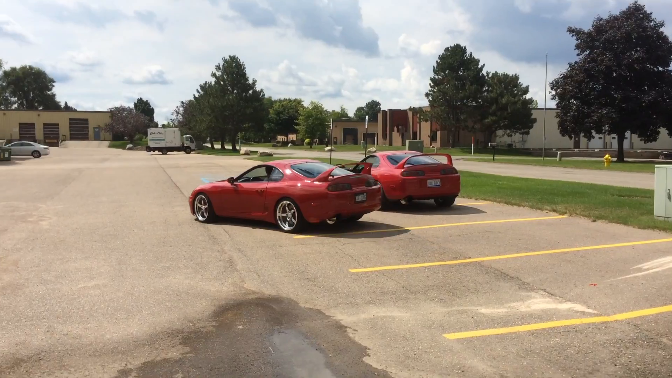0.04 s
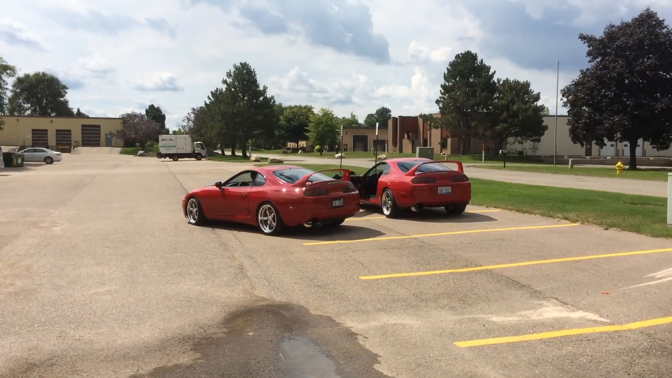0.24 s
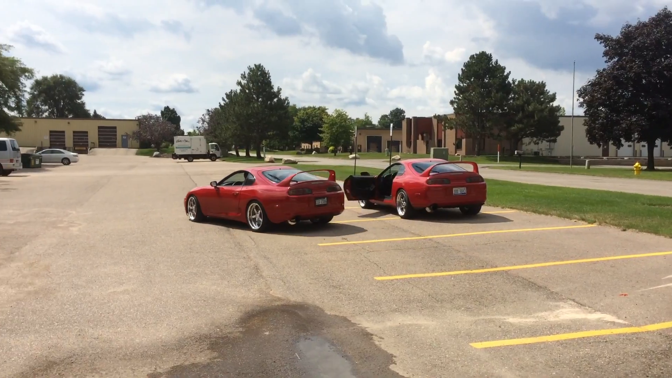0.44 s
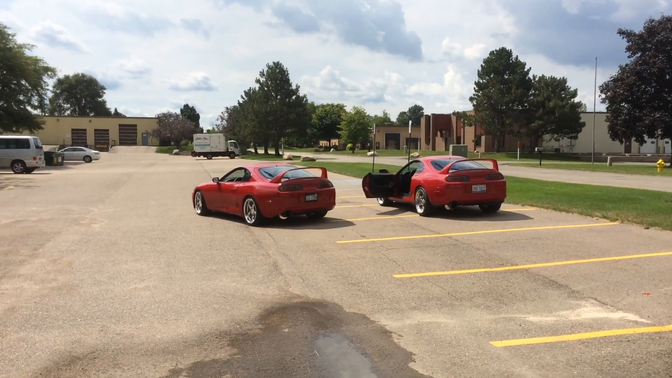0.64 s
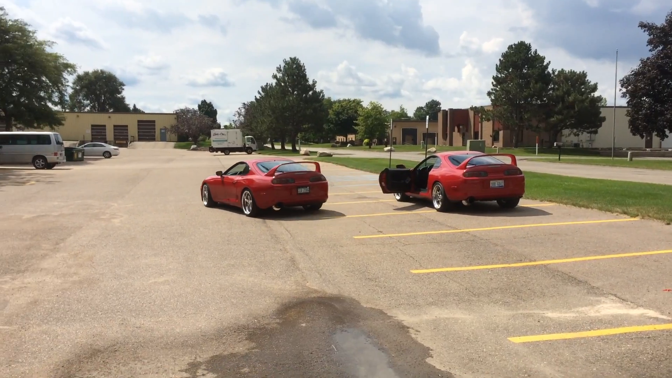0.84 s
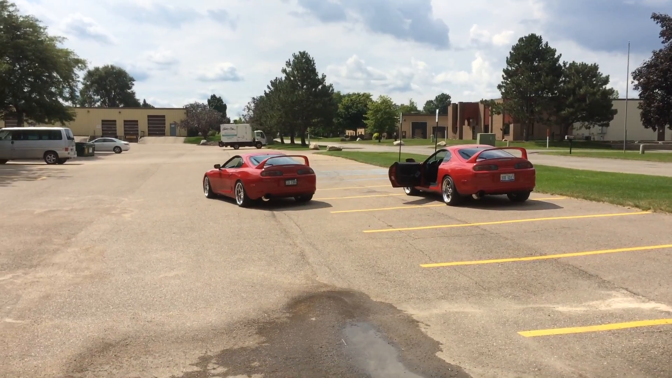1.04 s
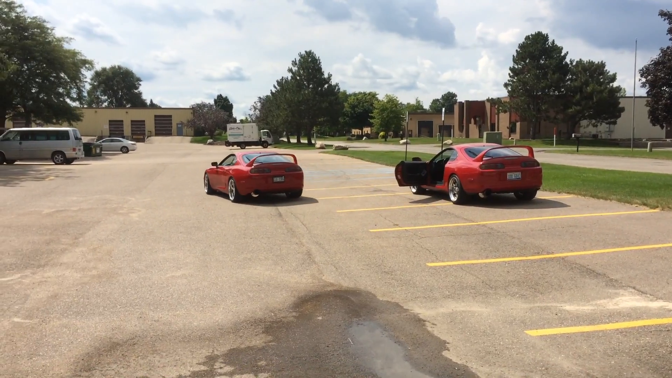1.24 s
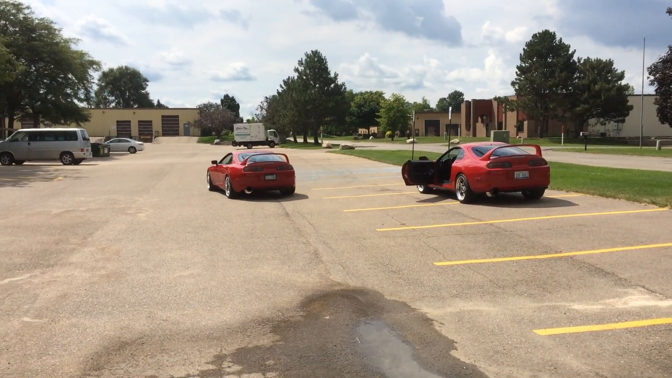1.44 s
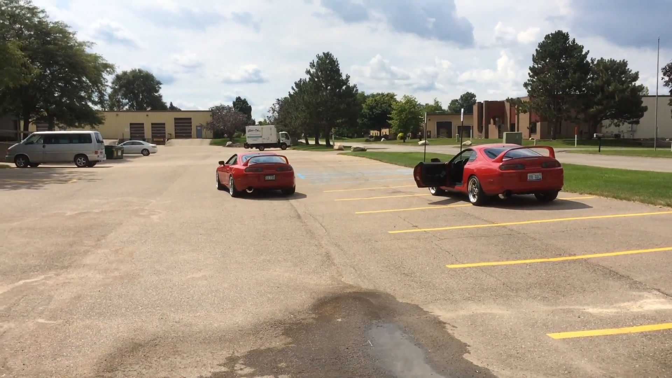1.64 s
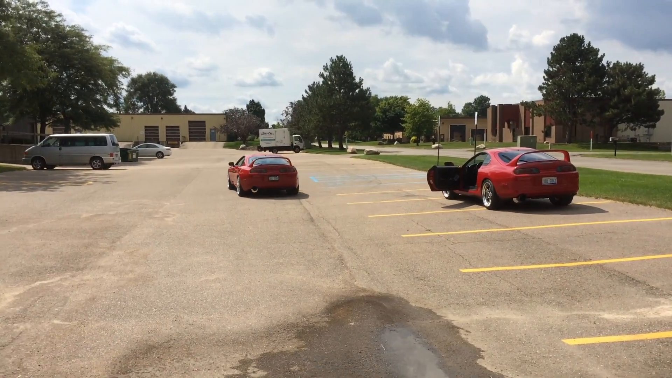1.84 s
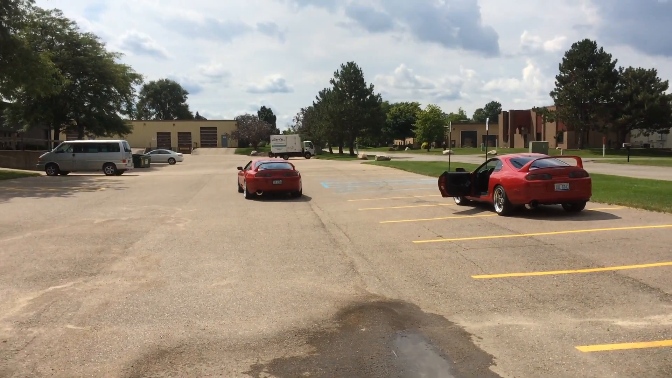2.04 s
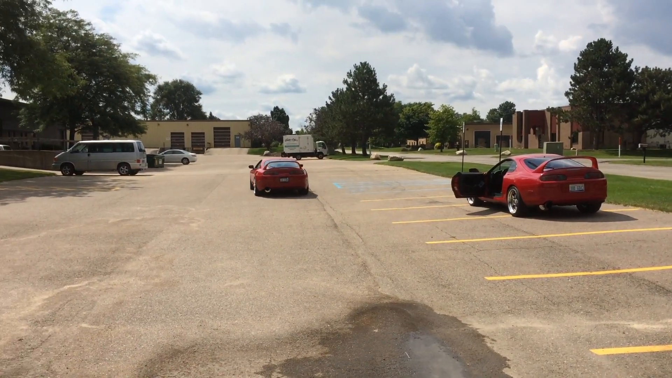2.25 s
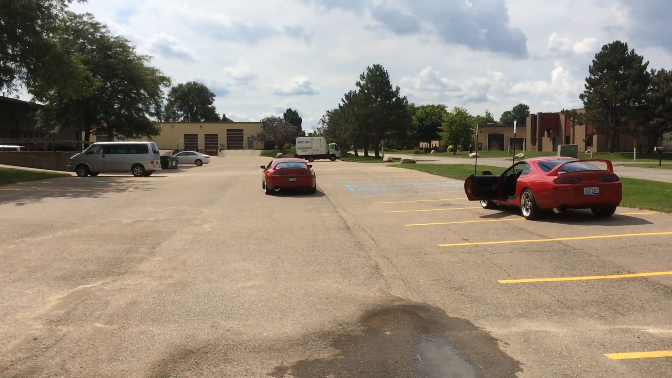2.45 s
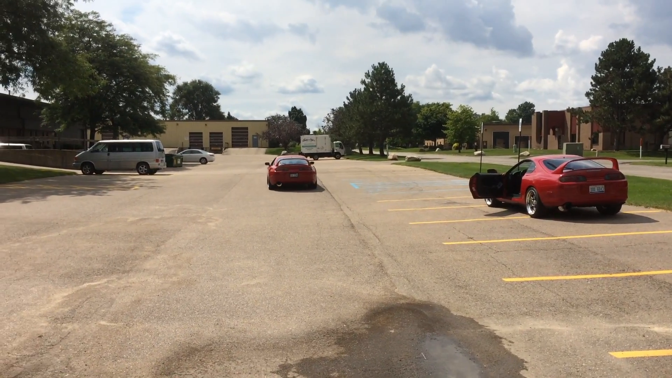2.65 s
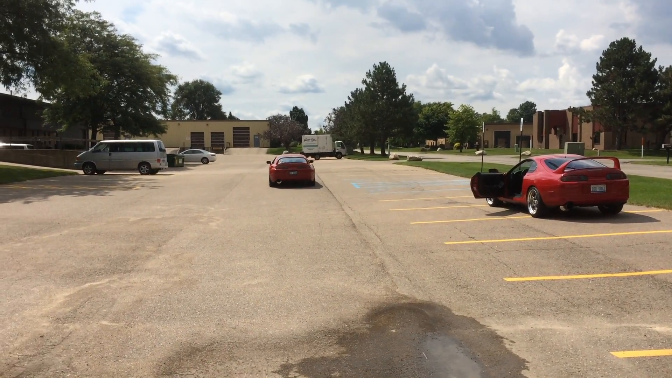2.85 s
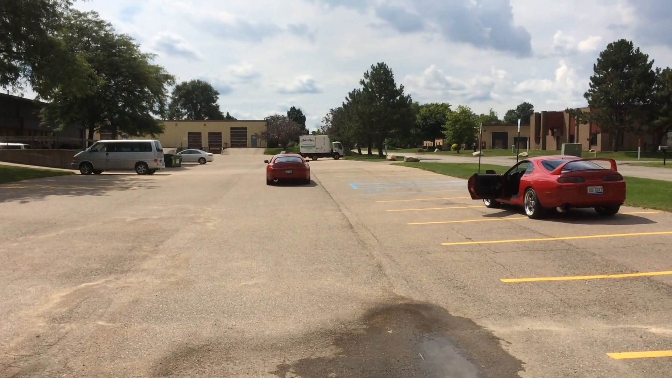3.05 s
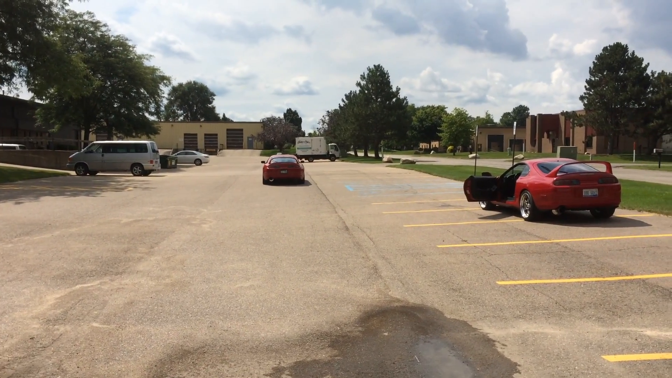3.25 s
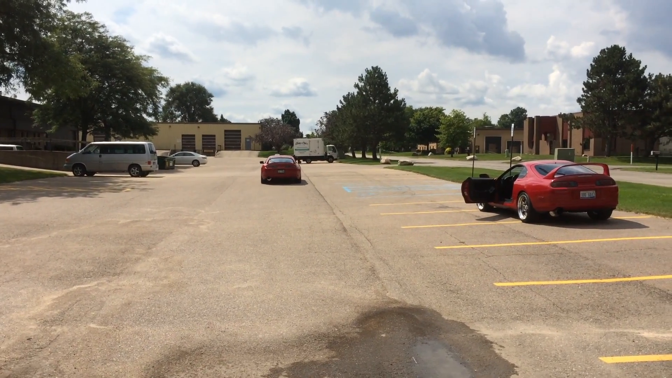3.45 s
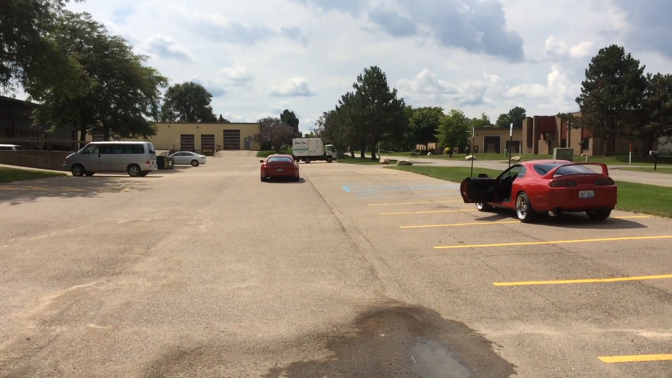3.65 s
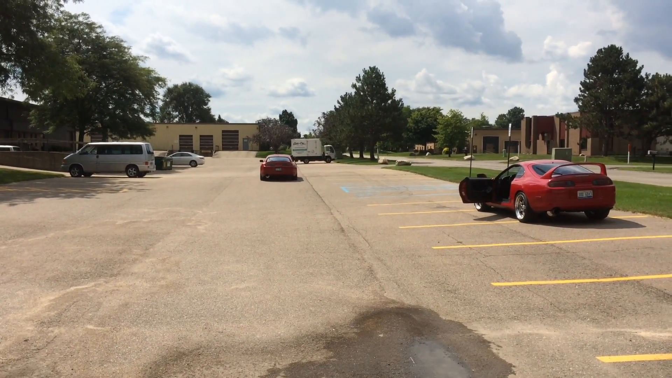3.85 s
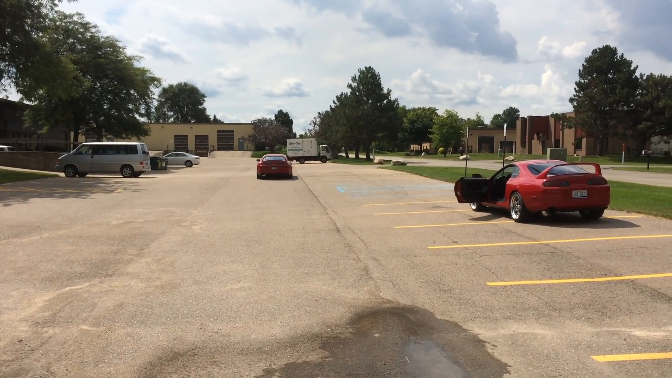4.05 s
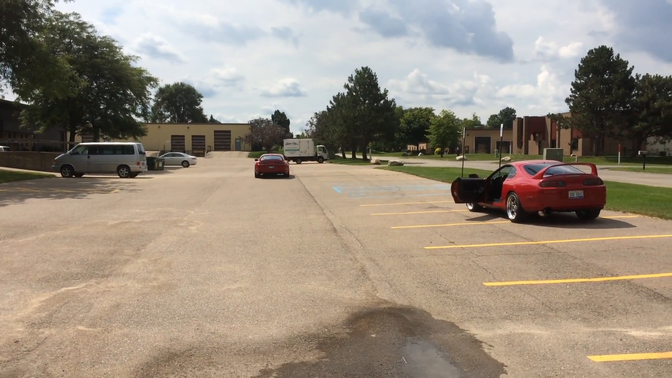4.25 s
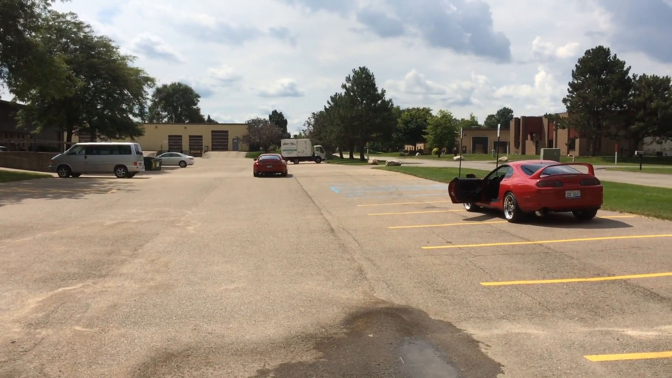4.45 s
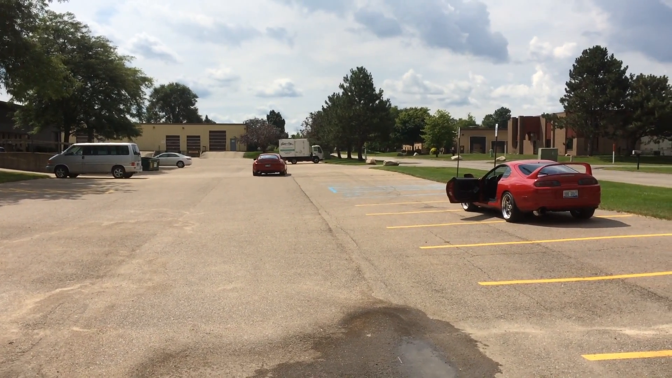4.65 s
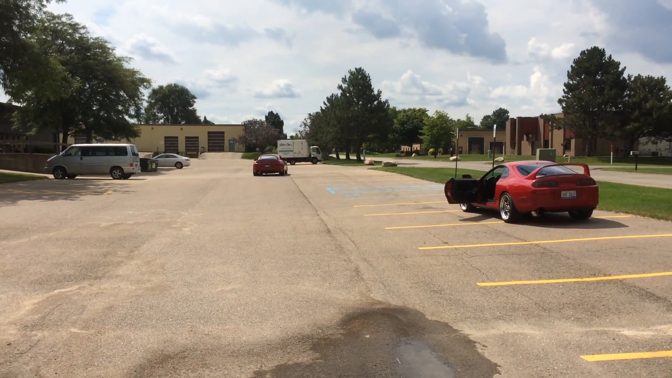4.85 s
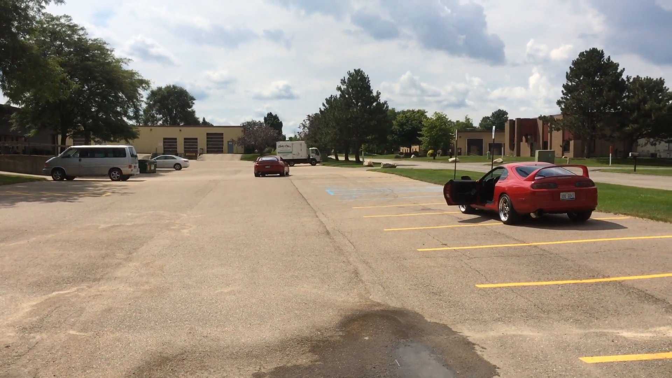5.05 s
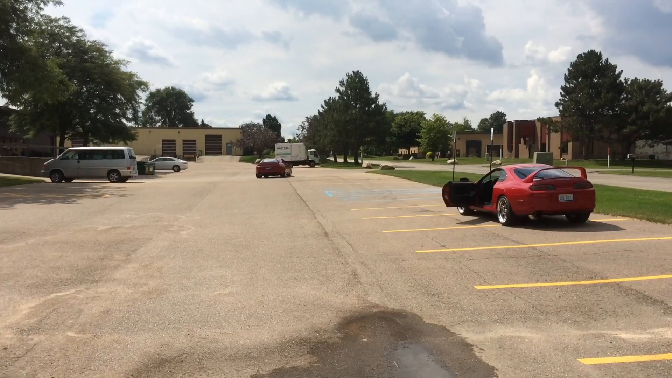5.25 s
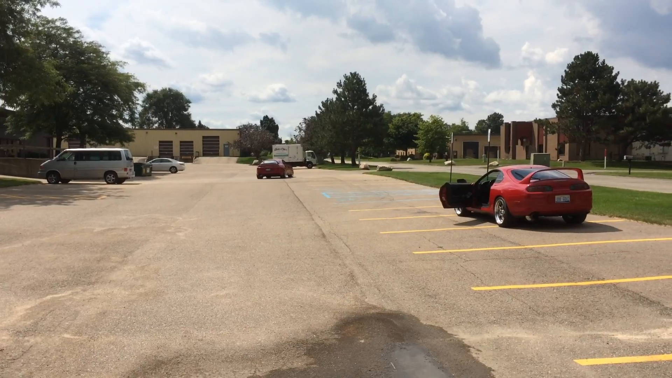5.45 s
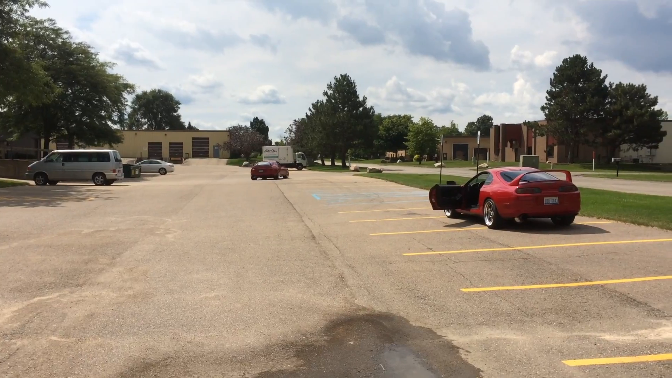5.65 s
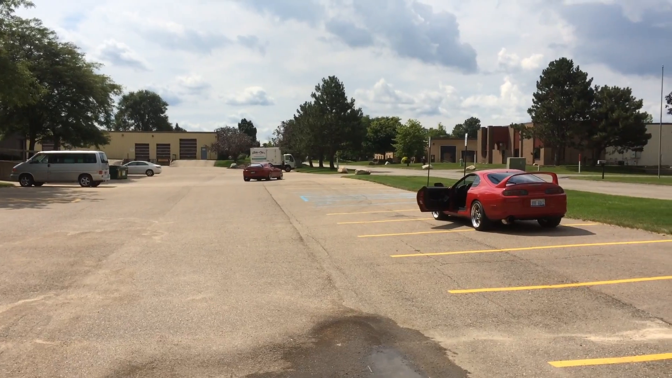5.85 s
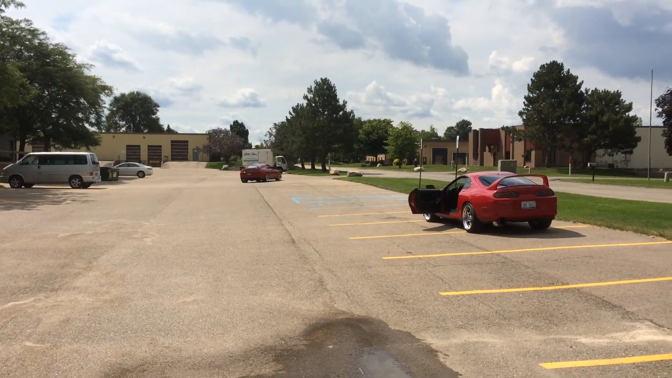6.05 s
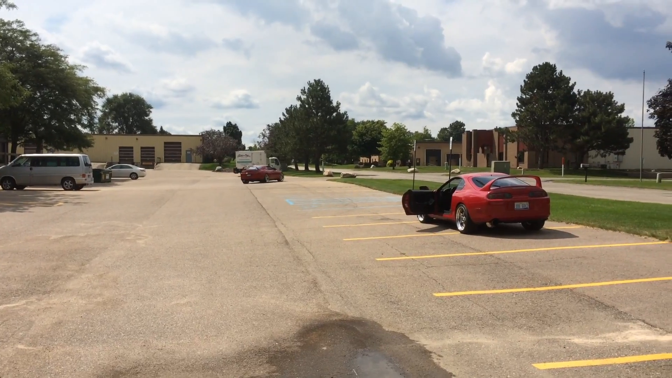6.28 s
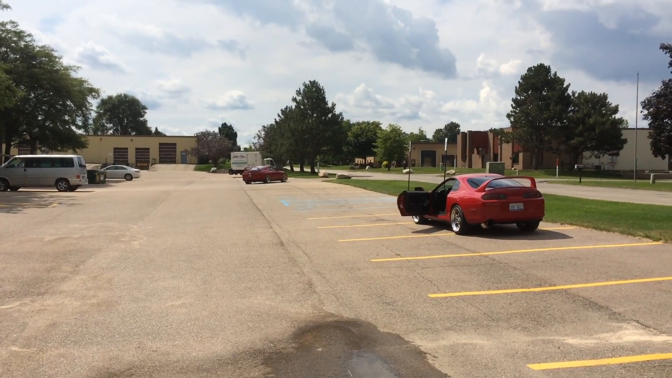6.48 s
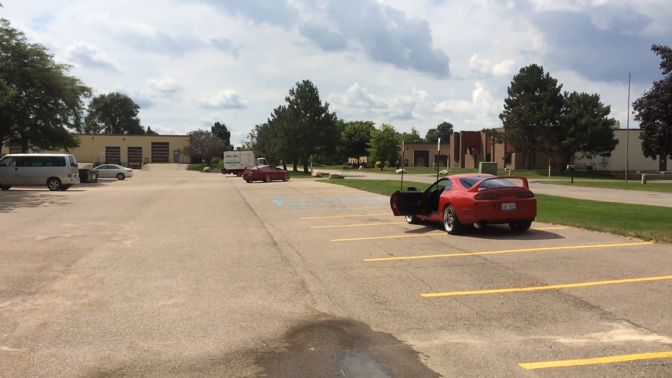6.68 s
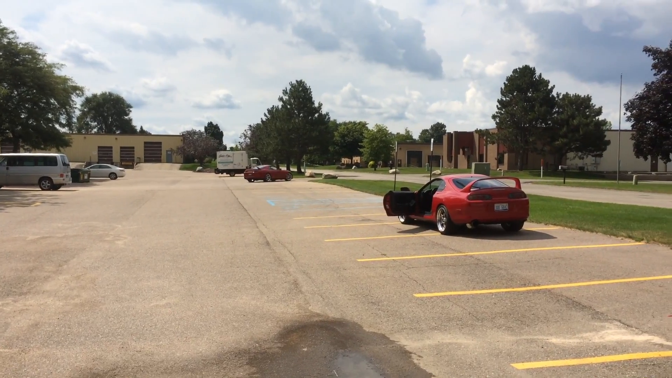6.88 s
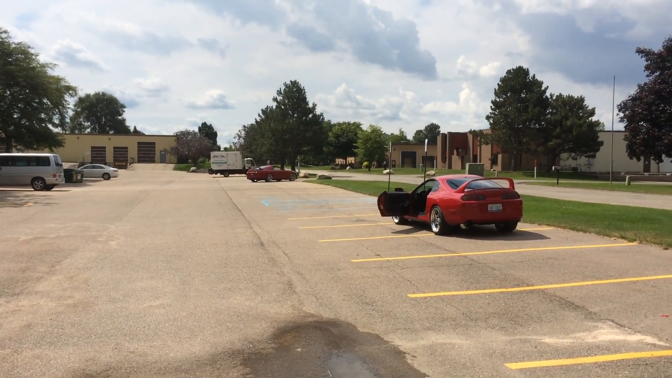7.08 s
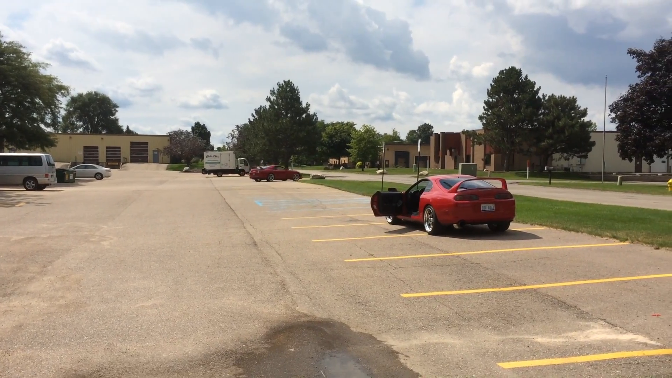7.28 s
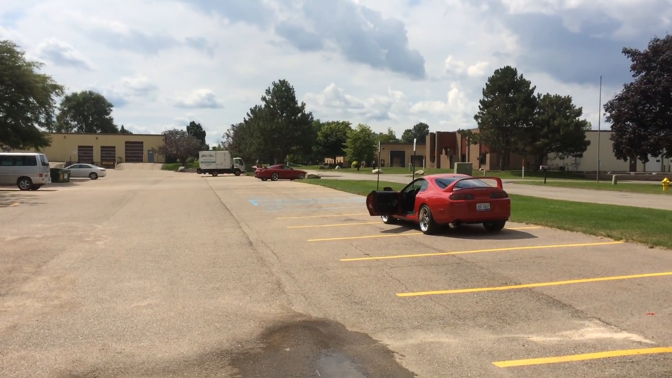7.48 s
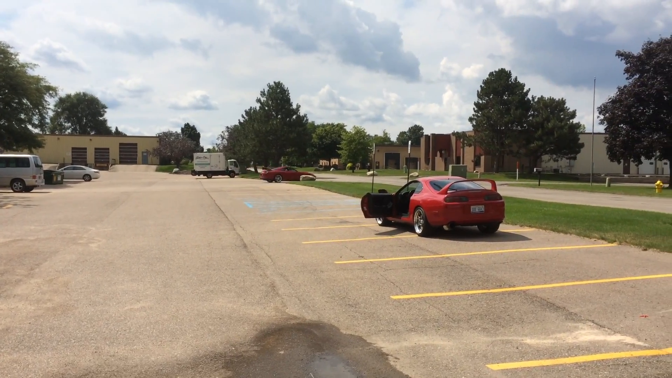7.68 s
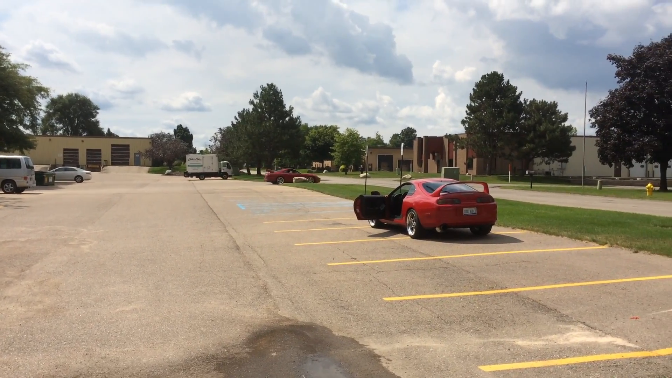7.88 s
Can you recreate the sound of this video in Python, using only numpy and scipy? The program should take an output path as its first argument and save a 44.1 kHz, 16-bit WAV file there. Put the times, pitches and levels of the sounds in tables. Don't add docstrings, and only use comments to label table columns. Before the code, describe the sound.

Deep raspy exhaust drone climbs as a car accelerates away, a stone cracks under a tyre, then it coasts off with soft burbles and wind thuds.

```python
import sys
import numpy as np
from scipy import signal
from scipy.io import wavfile
from scipy.ndimage import uniform_filter1d

SR = 44100
rng = np.random.default_rng(int(sys.argv[2]) if len(sys.argv) > 2 else 0)


def wav_out(sig):
    wavfile.write(sys.argv[1], SR, np.round(np.clip(np.atleast_2d(sig).T, -1, 1) * 32767).astype(np.int16))


def rack_gain(trim_db):
    fader = np.asarray(trim_db, float)
    return 10 ** (fader / 20)


N = 349272


def evened(x):
    return x / np.sqrt(np.mean(x ** 2) + 1e-20)


def clock():
    return np.arange(N) / SR


def curves(rows):
    s, *columns = np.transpose(rows)
    return [np.interp(clock(), s, c) for c in columns]


def read(points, hz):
    f, value = np.transpose(points)
    return np.interp(np.log(hz + 1), np.log(f + 1), value)


def bell(x, centre, half_width):
    return np.exp(-.5 * ((x - centre) / half_width) ** 2)


def drift(rate_hz):
    points = rng.standard_normal(400)
    coarse = np.interp(np.arange(0, N + 64, 64) / SR * rate_hz, np.arange(400), points)
    return uniform_filter1d(coarse, size=9).repeat(64)[:N]


def noise(shape, patchy_db, flicker_db, size=512):
    frames, hz = 4 * N // size + 5, np.fft.rfftfreq(size, 1 / SR)
    a, b, patches = rng.standard_normal((frames, len(hz), 3)).T
    patches = uniform_filter1d(patches, size=7, axis=0)
    patches = evened(uniform_filter1d(patches, size=14, axis=1))
    flicker = evened(uniform_filter1d(rng.standard_normal(frames), size=5))
    level_db = read(shape, hz)[:, None]
    z = (a + 1j * b) * rack_gain(level_db + patchy_db * patches + flicker_db * flicker)
    return evened(signal.istft(z, nperseg=size, noverlap=3 * size // 4)[1][:N])


# t/s, gas level/dB, tyre and rasp level/dB
CAR = [(0, -41, -44), (.46, -38.5, -45), (.79, -33.5, -45), (.97, -36.5, -47.5), (1.249, -34.5, -48.5),
       (2.14, -35.5, -48.5), (2.4, -35, -46.5), (2.82, -34, -46), (3.02, -38, -45), (3.37, -37, -43),
       (4.06, -42.5, -41.5), (4.3, -42.5, -42), (5.09, -43.5, -46), (5.8, -46, -50.5), (6.37, -51, -54.5),
       (6.9, -53.5, -53), (7.37, -49.5, -52), (7.92, -54.5, -57)]
# t/s, f/Hz
FIRING = [(0, 66.8), (.625, 75.4), (.86, 80.9), (1, 81.4), (1.28, 88.6), (1.43, 89.4), (1.62, 94.2),
          (2, 98.8), (2.75, 105), (3.125, 107.7), (4.05, 106.8), (4.6, 101.1), (4.875, 102.7), (5.2, 98.9),
          (6.4, 91.4), (7.25, 83.05), (7.75, 79.87), (7.92, 76.3)]
# t/s, firing tone level/dB, 2nd multiple level/dB
DRONE = [(0, -16.5, -22.5), (.25, -18.5, -25), (.4, -14.5, -19.5), (.9, -12.5, -18.5), (1.4, -12, -18),
         (1.75, -15.5, -29), (2.12, -15, -24.5), (2.5, -19.5, -29.5), (2.7, -16.5, -24), (3.3, -25.5, -27),
         (4, -29.5, -30), (4.25, -38, -37.5), (4.65, -29.5, -28.5), (5.1, -32, -31), (5.3, -48.5, -31.5),
         (6.3, -39, -51.5), (6.7, -45, -68), (7.92, -59, -50)]
# f/Hz, level above the gas/dB
MUFFLER = [(198, 18.5), (209, 19.5), (217, 5), (238, -18), (250, -3.5), (265, 2), (300, 7), (322, 0)]
# start t/s, length/s, level/dB of the firing tone, 2nd and 3rd multiple
BOOMS = [(5.092, 0.3, -65, -26.5, -41.5), (5.555, 0.12, -48, -31.5, -43), (5.74, .07, -31, -34, -42),
         (6.197, .1, -38.5, -42.5, -43), (6.354, 0.055, -44, -36, -42), (6.397, 0.15, -50, -56, -40.5),
         (6.7, 0.14, -52, -55, -43.5), (7.3, 0.13, -59, -32, -50), (7.49, 0.091, -58, -33, -62),
         (7.667, .14, -58, -36, -55), (7.836, .15, -52, -44, -42)]


def firing_levels_db():
    t = clock()
    coast_db = -9 * np.clip((t - 4.1) / 0.31, 0, 1)
    third_db = curves(CAR)[0] + read(MUFFLER, curves(FIRING)[0] * 3) + 1.07 + coast_db
    out = np.array(curves(DRONE) + [third_db])
    edge_db_per_s = 260
    for s, length, *db in BOOMS:
        outside_s = np.maximum(np.maximum(s - t, t - s - length), 0)
        out = np.maximum(out, np.array(db)[:, None] - edge_db_per_s * outside_s)
    return out


# t/s, level relative to the tone/dB
BEAT = [(0, -46), (.4, -6.5), (.8, -8.5), (1, -4), (1.2, -8), (1.5, -7.5), (1.9, -6), (2.3, -11.5),
        (2.7, -17), (3.1, -19), (3.6, -37)]


def exhaust():
    hz, levels_db = curves(FIRING)[0], firing_levels_db()
    turns = 2 * np.pi * np.cumsum(hz) / SR
    lines = [np.sqrt(2) * rack_gain(db + 0.88 * drift(30) + 1.03 * drift(9.8)) for db in levels_db]
    wobble = 0.052 * drift(25)
    lags = [0, 2.8, 2.8]
    tone = 0
    for k, (line, lag) in enumerate(zip(lines, lags), 1):
        tone = tone + line * np.cos(k * (turns + wobble) + lag)
    block_hz, in_step_s = SR / 128, 1.18
    beat = 4 * turns - 2 * np.pi * block_hz * clock()
    beat -= beat[round(in_step_s * SR)] - 2.3
    chop = .85 * np.tanh(2.8 * (np.cos(beat) - .3)) + .2
    folded = chop * np.cos(turns) + 0.22 * np.cos(turns - beat)
    return tone + lines[0] * rack_gain(curves(BEAT)[0]) * folded


# level/dB by sixths of the firing rate above a whole multiple, whole multiples first
CYLINDERS_DB = [3.5, -1.5, -14.5, 0, -6, -2.5]
# f/Hz, level/dB
PIPE = [(15, -25.5), (60, -9), (100, -8.5), (160, 13), (230, -6), (290, 5), (400, -5), (500, -8.5),
        (620, -12), (720, -5), (820, -13), (900, -14.5), (1200, -14.5), (1450, -10.5)]
# t/s, lift/dB
LOAD = [(0, 2.5), (1, 2.5), (1.601, 0.5), (2.4, 1), (2.9, -1.5), (3.2, -4.5), (4.2, -4), (4.6, 0.5), (6, 1),
        (7.92, -5)]
# level above the gas/dB, load share (dB per dB), swell t/s, swell level/dB, half width/s
STRONG = [
    (-1, 0.5, 2.8, 6, 0.49),
    (-5, -0.7, 4.8, 7.5, 0.39),
    (-8, 1, 0.95, 7, 0.54),
    (-10, 2, 0.46, 9, .17),
    (-14.5, 1.45, 2.4, 4.5, 0.33),
    (-18.5, -0.5, 2.35, 15, 0.085),
    (-24.5, -1.4, 3.7, 13.5, .3),
    (-28.5, -2.2, 4.36, 12.5, 0.31),
]


def crank_orders():
    step = 8
    hz, level_db, load_db = (curves(rows)[0][::step] for rows in (FIRING, CAR, LOAD))
    t = clock()[::step]
    strong = {}
    for k, (db, share, s, up_db, wide_s) in zip((8, 9, 20, 24, 30, 42, 45, 46), STRONG):
        strong[k] = level_db + db + share * load_db + up_db * bell(t, s, wide_s)
    turns, out = 2 * np.pi * np.cumsum(hz) * step / SR, 0
    for k in range(1, 81):
        if k in (6, 12, 18):
            continue
        order_hz, whole = hz * k / 6, k % 6 == 0
        if k in strong:
            ring_db = 13.5 * bell(order_hz, 350.3, 17.5) * bell(t, 0, 1.255) * whole
            db = strong[k] + 3.0 + 3 * drift(7)[::step] + ring_db
            blur = .35
        else:
            db = level_db - 7.5 + CYLINDERS_DB[k % 6] + read(PIPE, order_hz) + load_db * whole
            db = db + 2.8 * drift(6)[::step]
            blur = .035 * k
        phase = 6.36 * rng.random() + blur * drift(14)[::step]
        out = out + rack_gain(db) * np.cos(k / 6 * turns + phase)
    return signal.resample_poly(out, step, 1)[:N]


def grit():
    pops_per_s = 220
    sizes = rack_gain(2.5 * np.minimum(rng.exponential(1, N), 4)) * rng.standard_normal(N)
    pops = sizes * (rng.random(N) < pops_per_s / SR)
    band = signal.butter(4, [700, 2300], "band", fs=SR, output="sos")
    return evened(signal.sosfilt(band, pops))


# f/Hz, level/dB per Hz
ROAR = [(150, 1.5), (250, 5.5), (284, -3.5), (420, -11.5), (588, -15.5), (705, -5), (988, -14),
        (1290, -14.5), (1900, -19.5), (2200, -37.5), (2860, -76.5), (4840, -120)]
# f/Hz, level/dB per Hz
RASP = [(650, -4.5), (1100, -3), (1330, -0.5), (1810, -7), (2190, -4), (2840, -10), (3100, -14),
        (3980, -28.5), (4400, -28), (5500, -38.5), (7150, -61), (12100, -120)]
# f/Hz, level/dB per Hz
HISS = [(2060, -15), (3500, 5.5), (3980, 2), (4480, -7.5), (6120, -2), (7780, -6), (9770, -6.5),
        (13000, -11), (14600, -50), (15200, -19)]


def road():
    gas_db, rasp_db = curves(CAR)
    t = clock()
    roar_db = -38.5 + 0.42 * (gas_db + 40)
    near_db = 7 * bell(t, 0, 1.1)
    vent_db = 2 * bell(t, 3.95, 0.15)
    hiss_db = -55.5 + 0.32 * (rasp_db + 49) + near_db + vent_db
    turns = 2 * np.pi * np.cumsum(curves(FIRING)[0]) / SR
    puff = 1 + 0.11 * np.cos(turns) + 0.073 * np.cos(turns / 3)
    roar = rack_gain(roar_db + 2.5) * noise(ROAR, 1.9, 0.47, size=1024)
    body_hz, body_wide_hz = 2152, 30
    body = signal.iirpeak(body_hz, body_hz / body_wide_hz, SR)
    ringing = evened(signal.lfilter(*body, rng.standard_normal(N)))
    rasp = noise(RASP, 0.87, 0.77) + rack_gain(-11.5) * ringing + rack_gain(-14) * grit()
    hiss = rack_gain(hiss_db - 4.5) * noise(HISS, 0.76, 1.0)
    return puff * (roar + rack_gain(rasp_db + 1.37) * rasp) + hiss


# peak t/s, peak level/dB, rise/s and fall/s over 20 dB
GUSTS = [(3.801, -29.5, 0.16, 0.49), (3.96, -30.5, .3, .6), (4.1, -29.5, 0.58, 0.17),
         (4.22, -32, 0.18, 0.095), (4.57, -34, 1.1, 0.17), (4.67, -26, .06, .25), (5.0, -34, 1.6, .25),
         (5.13, -34.5, .4, 0.14), (5.31, -42, 0.098, .1), (5.44, -33, 0.083, 0.067),
         (5.59, -36, 0.034, .04), (5.75, -35, 0.062, .05), (5.93, -35.5, 0.18, .12), (6.11, -39, 0.15, .17),
         (6.5, -35, 0.32, 0.046), (6.74, -41, .15, .03), (7.05, -39, 0.37, 0.045), (7.2, -36, 0.12, 0.22),
         (7.37, -37.5, 0.038, 0.47), (7.59, -43, 0.67, 0.028), (7.69, -53, .08, .15), (7.87, -37, .06, .12)]


def gusts_db():
    t, out = clock(), np.full(N, -90.)
    for s, db, rise_s, fall_s in GUSTS:
        out = np.maximum(out, db - 20 * np.maximum((s - t) / rise_s, (t - s) / fall_s))
    return out


# t/s, level/dB
RUMBLE = [(0, -26.5), (.5, -27.5), (1, -30.5), (1.5, -39.5), (2.5, -32), (3.4, -30), (3.7, -32),
          (3.95, -68)]
# f/Hz, level/dB per Hz
WIND = [(20, -32.5), (45, 3), (70, 12.5), (110, 8), (160, 12), (230, 1), (330, -7.5), (480, -43)]


def wind():
    gust_db = gusts_db()
    lumps = rack_gain(np.maximum(curves(RUMBLE)[0], gust_db) + 0.5) * noise(WIND, 1.5, 1.0, size=2048)
    thud_hz = 77 + 4.6 * drift(6.9)
    return lumps + rack_gain(gust_db + 2.0) * np.cos(2 * np.pi * np.cumsum(thud_hz) / SR)


# f/Hz, level/dB per Hz
FIELD = [(2500, -25.5), (3600, -14), (4600, -2), (6800, -26.5), (7300, -0.5), (8650, -0.5), (8900, -14),
         (12000, -6.5), (15200, -3)]
# t/s, level/dB
FIELD_DB = [(0, -80.5), (4, -60.5), (5, -64), (6, -60.5), (7.92, -59.5)]


def far_field():
    return rack_gain(curves(FIELD_DB)[0]) * noise(FIELD, 1.21, 0.46)


def rings(events, noise_share, rise_s=0.00061):
    out, t = np.zeros(N), np.arange(1500) / SR
    for s, db, hz, t60 in events:
        band = signal.butter(2, [.7 * hz, min(1.4 * hz, 16000)], "band", fs=SR, output="sos")
        burst = evened(signal.sosfilt(band, rng.standard_normal(1500)))
        wave = noise_share * burst - (1 - noise_share) * np.sin(2 * np.pi * hz * t)
        part = out[round(s * SR):][:1500]
        part += (rack_gain(db - 60 * t / t60) * np.tanh((t / rise_s) ** 2) * wave)[:len(part)]
    return out


# t/s, peak level/dB, f/Hz, t60/s
CLICKS = [(0.097, -36, 3900, 0.0088), (0.1894, -31, 3160, 0.008), (0.2768, -38, 3220, 0.008),
          (1.9245, -32, 3060, 0.0078), (3.8636, -43, 3120, 0.0069), (4.145, -45, 3280, 0.0072),
          (5.9196, -51, 3010, 0.0081), (7.1671, -35.5, 3000, 0.0077), (7.3394, -38, 2600, 0.0076),
          (7.5347, -37, 3540, 0.008), (7.8891, -42, 3355, 0.01)]
# t/s, peak level/dB, f/Hz, t60/s
SNAPS = [(0.1394, -48, 6150, 0.0073), (0.5694, -44, 6660, 0.006), (1.2096, -41, 6910, 0.0072),
         (4.2283, -38, 7950, 0.0055), (5.3994, -46, 7220, 0.0061), (6.5166, -46, 7480, 0.006),
         (7.1894, -47, 7166, 0.0061)]
# t/s, peak level/dB, f/Hz, t60/s
TICKS = [(0.768, -28, 665.5, 0.022), (2.675, -26, 724, 0.017), (2.733, -30, 710.6, 0.013),
         (4.516, -23.5, 753.2, 0.015), (5.141, -36, 782.5, 0.015), (5.172, -40, 1350, 0.024),
         (7.149, -30, 1483, 0.013), (7.889, -34, 965, 0.016), (7.2429, -42, 2242, 0.013),
         (7.3357, -39, 1420, 0.022), (7.5547, -38, 1705, 0.015)]


def handling():
    return rack_gain(5.5) * (rings(CLICKS, .42) + rings(SNAPS, .8) + rings(TICKS, .25))


# f/Hz, level/dB, t60/s
STONE = [(1310, 0, .005), (2200, -13, .005), (3000, -21, .005), (4600, -29, .003), (6000, -29, .003),
         (7200, -34, .003)]
# t/s, peak level/dB, f/Hz, t60/s
ECHOES = [(.6638, -17, 1380, 0.019), (.6655, -29, 3786, 0.0093), (.6682, -24, 1520, 0.018),
          (.6772, -19, 1400, 0.016), (.6838, -24, 1290, 0.012), (.6948, -35, 1910, .016)]


def stone_crack():
    modes = [(.66117 - hz * 6e-8, 7.5 + db, hz, t60) for hz, db, t60 in STONE]
    return rings(modes, .04, rise_s=.0005) + rack_gain(5.5) * rings(ECHOES, .3)


# t/s, peak level/dB, f/Hz, t60/s
JINGLE = [(3.2235, -46, 8580, .03), (3.2235, -44, 9600, .025), (3.2245, -45, 11300, .035),
          (3.227, -50, 14190, .025)]


def jingle():
    return rack_gain(5.5) * rings(JINGLE, .3)


def scene():
    car = exhaust() + crank_orders() + road()
    air = wind() + far_field()
    return (car + air + handling() + stone_crack() + jingle())[None]


def band_limit(x):
    return signal.sosfilt(signal.butter(12, 16320, fs=SR, output="sos"), x)


def record(dry):
    cut = signal.sosfilt(signal.butter(2, 30, "high", fs=SR, output="sos"), dry)
    edge = signal.firwin(1023, 15310, window=("kaiser", 9), fs=SR)
    cut = signal.oaconvolve(cut, edge[None], "same")
    return band_limit(cut)


dry = scene()
out = record(dry)
wav_out(out)
```